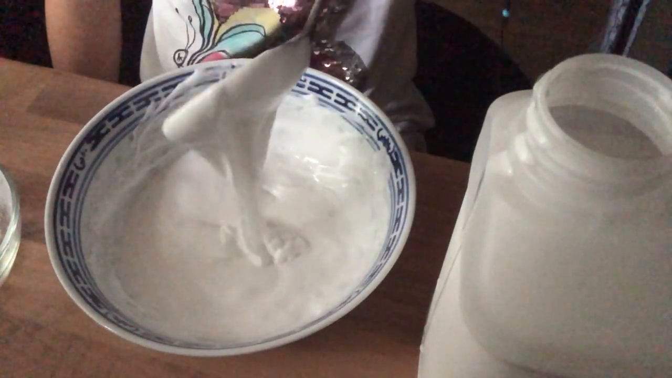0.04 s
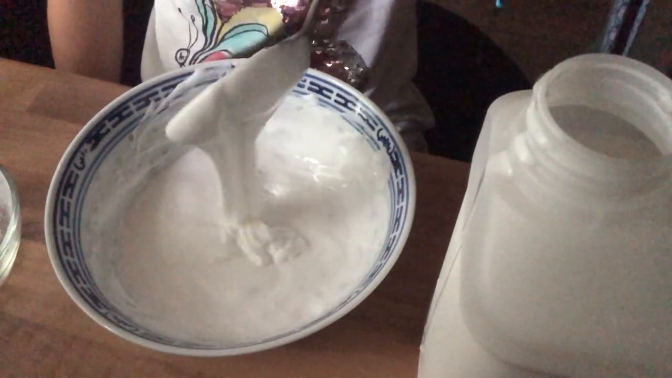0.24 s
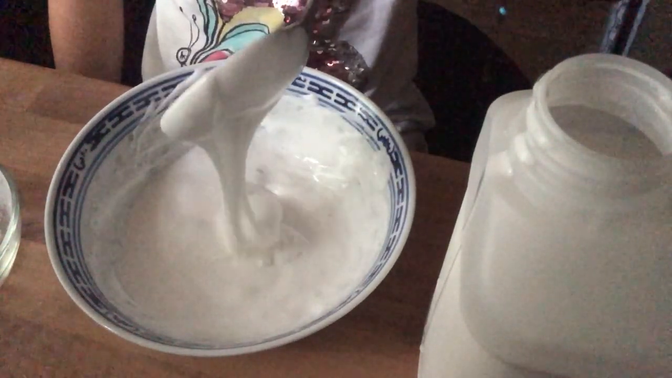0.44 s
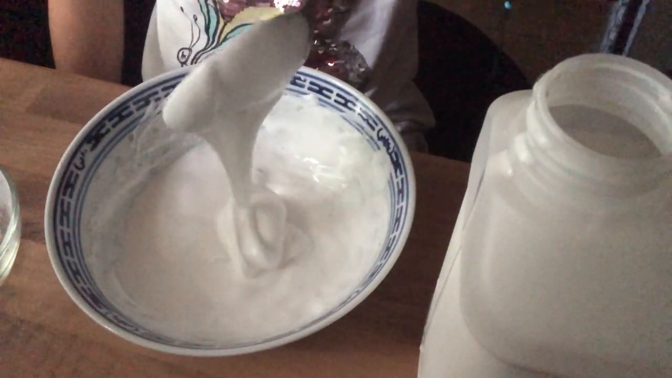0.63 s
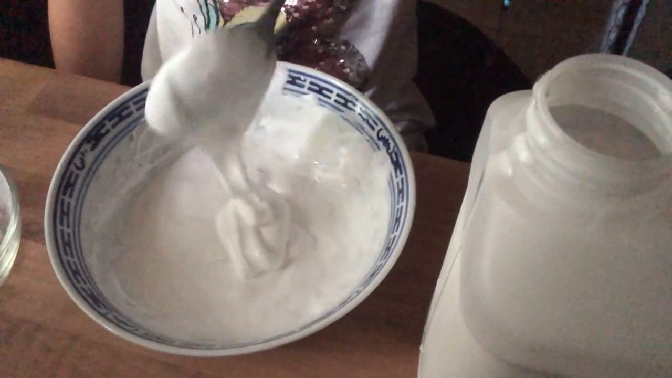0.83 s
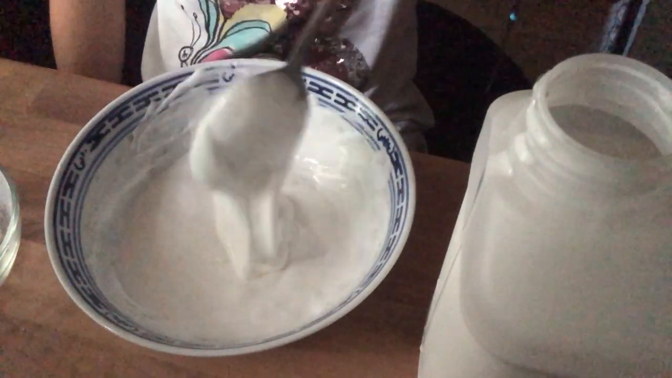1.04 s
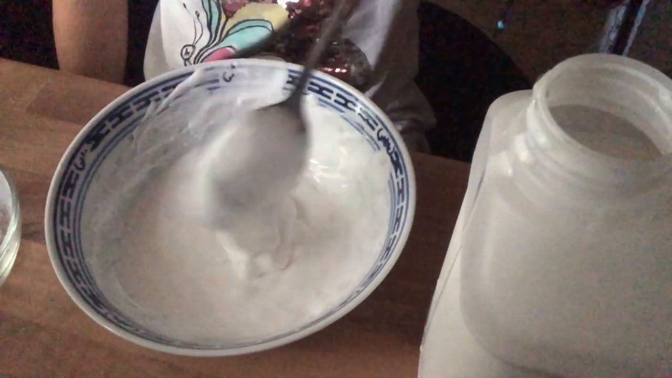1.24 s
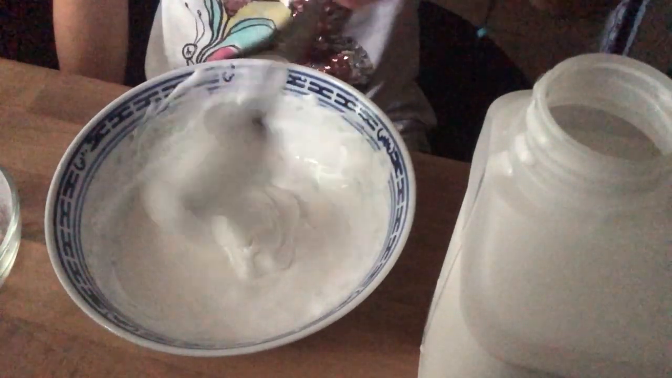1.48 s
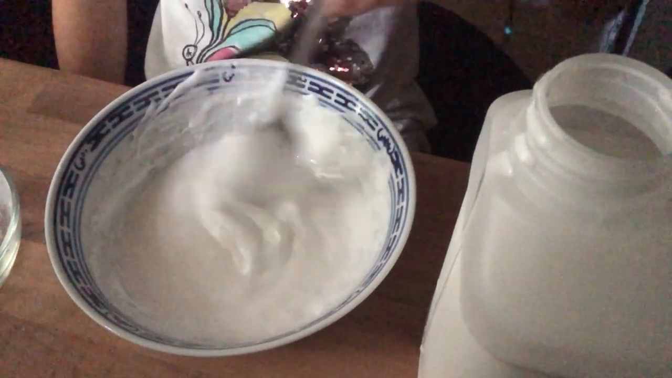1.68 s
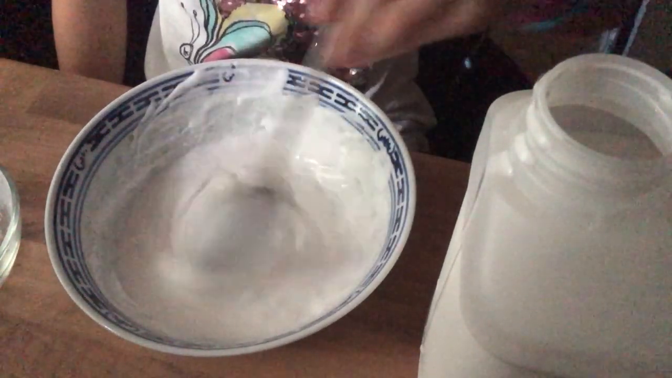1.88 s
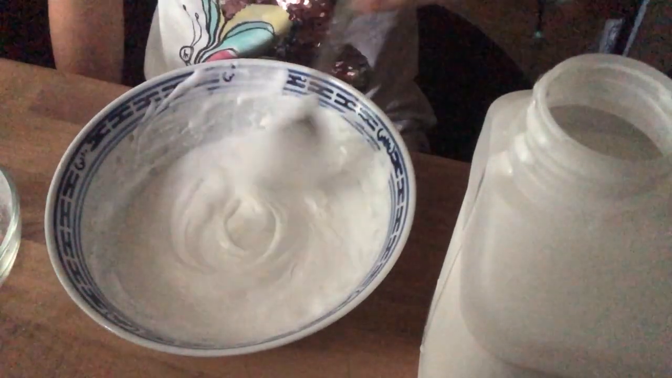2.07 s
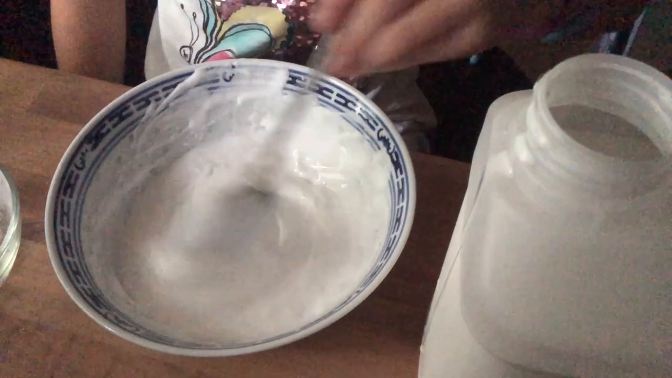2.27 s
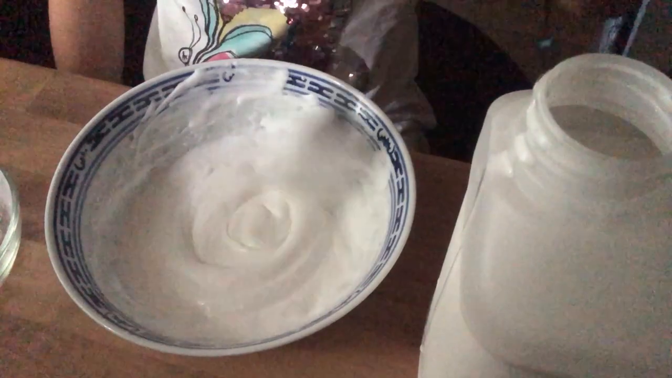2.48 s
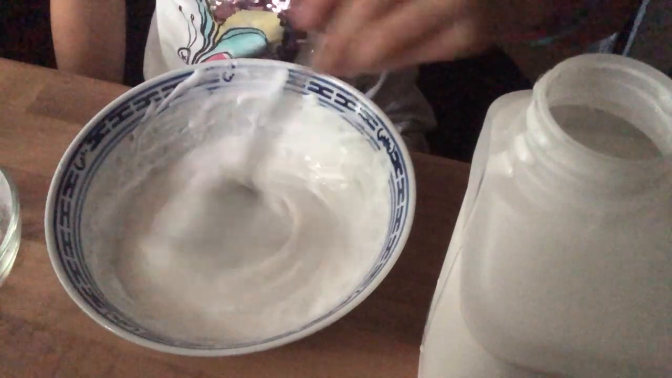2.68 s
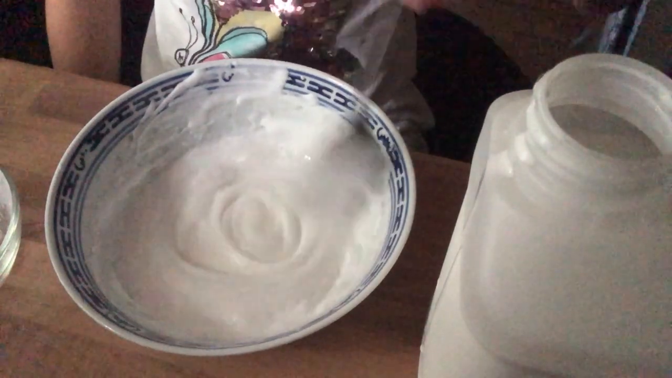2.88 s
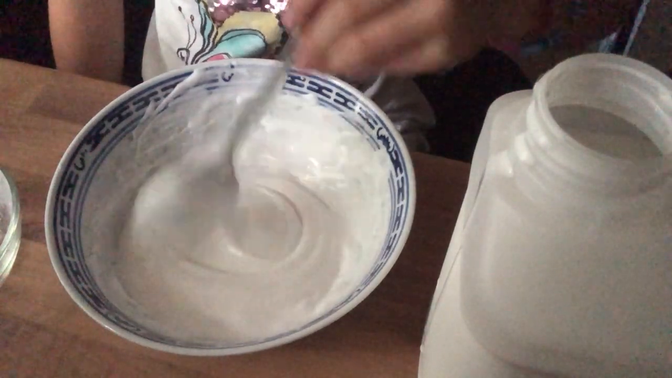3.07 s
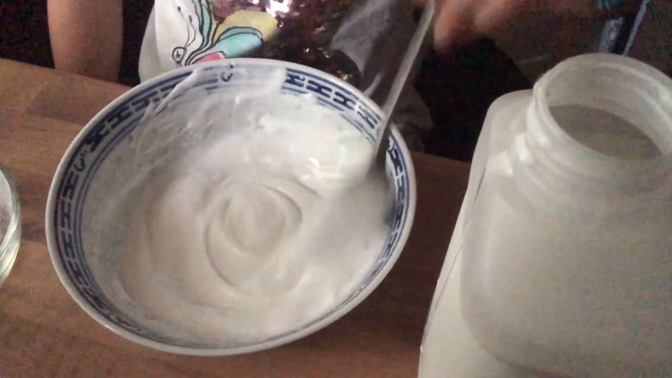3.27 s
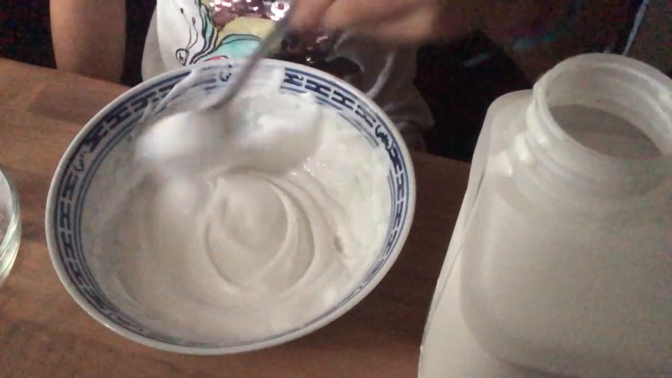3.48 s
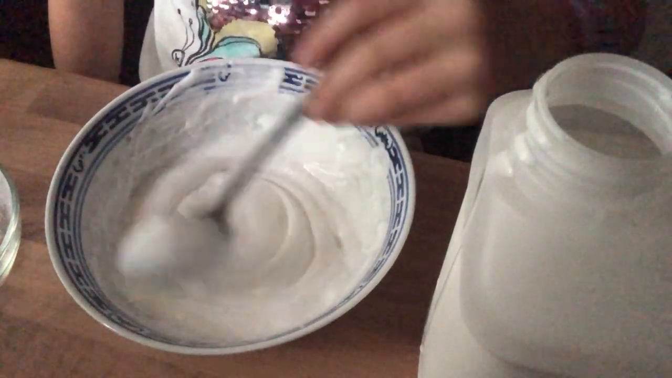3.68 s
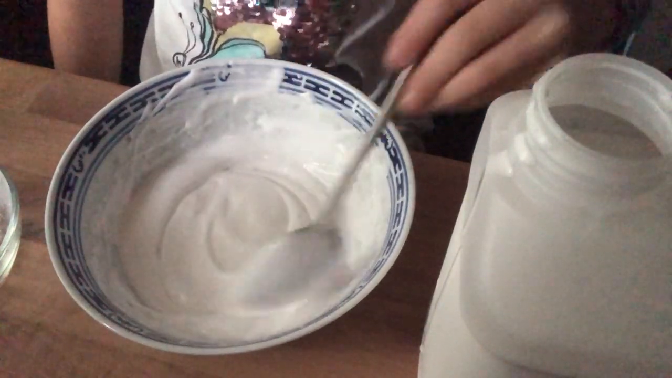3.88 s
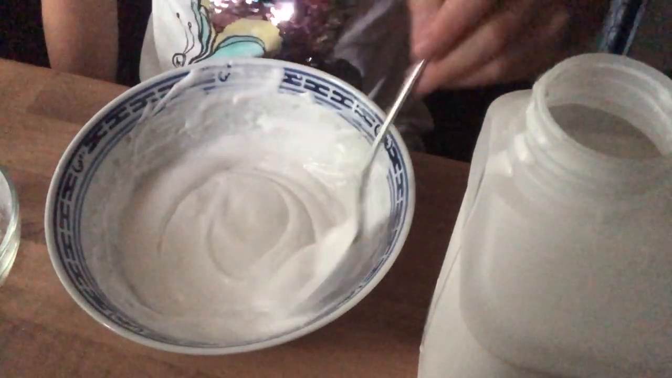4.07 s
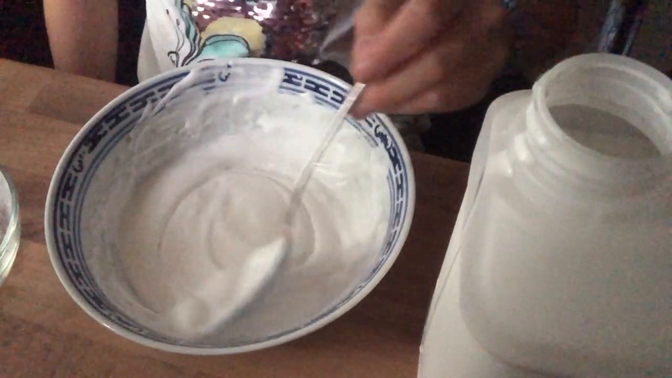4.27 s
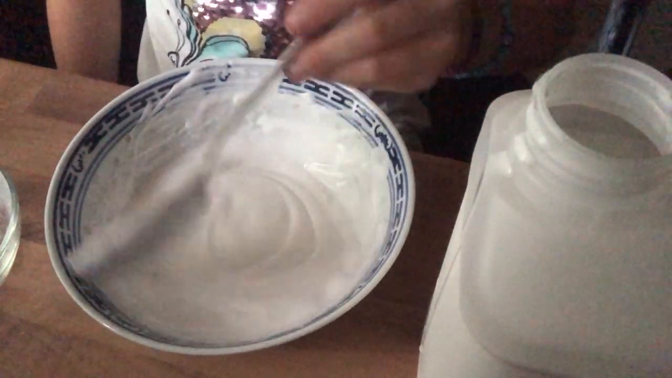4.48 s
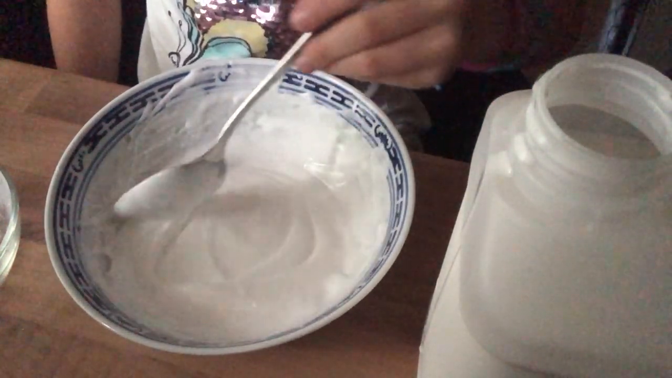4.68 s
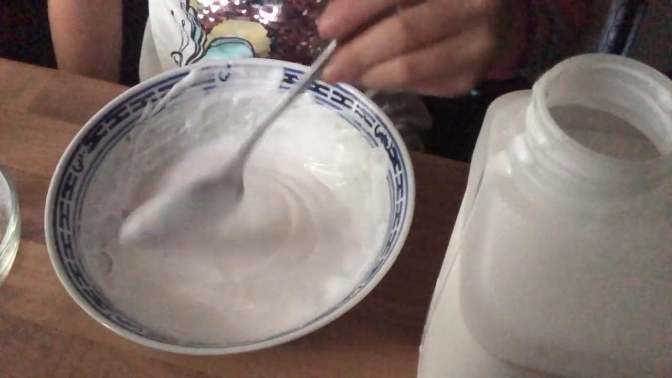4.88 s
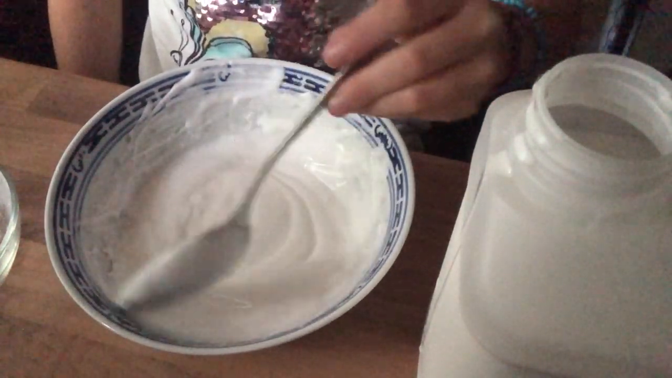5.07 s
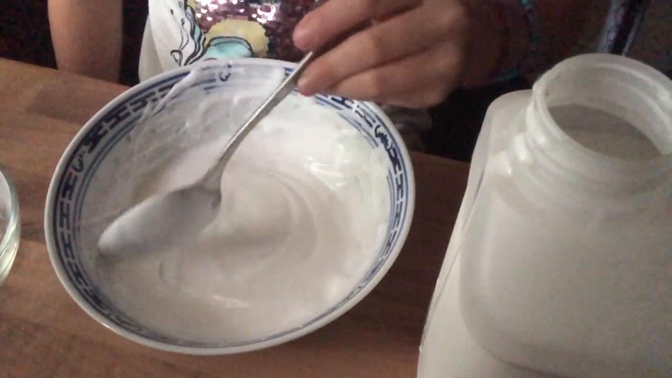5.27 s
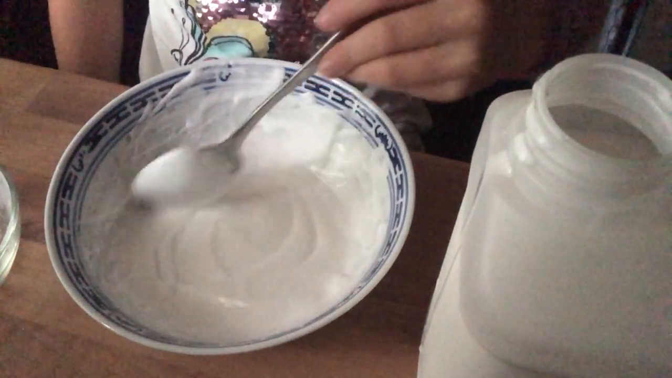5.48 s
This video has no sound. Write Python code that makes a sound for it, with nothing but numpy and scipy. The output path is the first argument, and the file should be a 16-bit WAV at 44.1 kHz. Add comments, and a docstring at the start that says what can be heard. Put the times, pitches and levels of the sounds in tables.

```python
"""In a quiet room, a metal spoon stirs a thick foamy mixture in a porcelain bowl on a wooden table.
Bare contacts set the bowl ringing; cushioned ones clack, thump the table and mostly ring the spoon.
Late on the spoon slides along the wall, its tip biting through to the glaze, and jabs it once, chattering.
Rings are sums of dying sine waves; thuds, scrapes, snaps and room noise are filtered random noise.
Faint snaps, ticks and rustles, low rumbles of the table, room reflections and a faint hum complete it."""
import sys
import numpy as np
from scipy import signal
from scipy.fft import next_fast_len
from scipy.io import wavfile

SR = 44100
rng = np.random.default_rng(int(sys.argv[2]) if len(sys.argv) > 2 else 0)


def transcribe(u):
    """Save the signal u as a 16-bit wav file named by the first command-line argument.

    u: samples, shape (n,) or (channels, n), limited to [-1, 1]; the rate is SR.
    q: integer samples, one column per channel.
    """
    v = np.clip(np.atleast_2d(u).T, -1, 1)
    q = np.round(v * 32767).astype(np.int16)
    wavfile.write(sys.argv[1], SR, q)


N = 243431  # length in samples, about 5.5 s
RING_T = np.arange(SR * 6 // 10) / SR  # time axis of one short sound, 0.6 s

# main ringing tones of the bowl: pitch_hz, level_db (relative), t60_s (time to lose 60 dB)
BOWL_MODES = [(889, 0, .32), (1647, 0, .37), (2778, 0, .24)]
# spectrum of a metal tick: frequency_hz, level_db (per Hz, relative)
TICK_COLOUR = [(500, -28.5), (3500, -9.5), (6000, -3.5), (8000, -6.5), (9300, -14), (12000, -8),
               (16000, -21)]
# spectrum of wet friction: frequency_hz, level_db (per Hz, relative)
RASP_COLOUR = [(300, -20), (1400, -6.5), (2500, -0.5), (4500, -11), (6000, -17), (8000, -22.5),
               (16000, -27)]


def amp(db):
    """Turns decibels into a gain."""
    return 10 ** (np.asarray(db) / 20)


def unit(x):
    """Scales a sound to an rms (average strength) of one."""
    return x / np.sqrt(np.mean(x ** 2) + 1e-20)


def read(points, hz):
    """Joins (frequency, value) points by straight lines on a log-frequency axis."""
    point_hz, value = np.transpose(points)
    return np.interp(np.log(hz + 1), np.log(point_hz + 1), value)


def add(mix, start_s, sound):
    """Mixes a sound in at its start time, cutting off what runs past the end."""
    part = mix[round(start_s * SR):][:len(sound)]
    part += sound[:len(part)]


def colour(x, points, corner_hz=np.inf):
    """Filters without pre-echo to the given spectrum; a soft contact rolls off above its corner."""
    size = next_fast_len(len(x) + 4096)
    hz = abs(np.fft.fftfreq(size, 1 / SR))
    roll_off = .5 * np.log1p((hz / corner_hz) ** 7.3)
    log_gain = np.log(amp(read(points, hz))) - roll_off
    response = np.exp(np.conj(signal.hilbert(log_gain)))  # minimum phase: nothing sounds early
    return np.fft.ifft(np.fft.fft(x, size) * response).real[:len(x)]


def dying(t60_s):
    """Exponential decay that loses 60 dB in t60_s."""
    return np.exp(-np.log(1000) * RING_T / t60_s)


def burst(points, t60_s, corner_hz=np.inf, rise_s=0.00034):
    """Dying noise, like many crowded, heavily damped tones; has the energy of 25 ms at unit rms."""
    swell = 1 - np.exp(-RING_T / rise_s)
    noise = rng.standard_normal(len(RING_T)) * swell * dying(t60_s)
    x = colour(noise, points, corner_hz)
    return x / np.linalg.norm(x) * np.sqrt(.025 * SR)


def ring(modes, hold=1, build_s=0.0018):
    """Sine tones that swell briefly after the contact, then die; hold scales the ring time."""
    swell = 1 - np.exp(-RING_T / build_s)
    tones = sum(amp(db) * dying(t60_s * hold) * np.sin(2 * np.pi * hz * RING_T)
                for hz, db, t60_s in modes)
    return swell * tones


def resonate(x, modes):
    """Sums side-by-side resonances; each filters the sound twice to get steep skirts."""
    out = 0
    for hz, width_hz, db in modes:
        peak = np.concatenate(signal.iirpeak(hz, hz / width_hz, SR))
        out = out + amp(db) * signal.sosfilt([peak, peak], x)
    return out


def wander(t, depth_db, step_s=0.029):
    """A gain that drifts at random, heading for a new value every step_s."""
    knots = rng.standard_normal(200)
    drift = np.interp((t - t[0]) / step_s, np.arange(len(knots)), knots)
    return amp(depth_db * drift)


def push(t, length_s, attack_s, release_s):
    """One push of the hand, t seconds after it starts: rises, holds, then loses 60 dB in release_s."""
    attack = np.clip(t / attack_s, 0, 1)
    release = np.exp(-np.log(1000) * np.maximum(t - length_s, 0) / release_s)
    return attack * release


def contact(blow_db, hard_hz, thud_db):
    """One spoon touch: a crack, the crockery's clack, a metal tick and the table's thud."""
    # spectrum of crack and clack: frequency_hz, level_db (per Hz, relative)
    clack_colour = [(100, -36.5), (600, -15.5), (850, -1.5), (1150, 3.5), (1420, -4), (1800, 2),
                    (2300, -5.5), (2750, 5), (3600, -4.5), (16000, -6)]
    # spectrum of the table's thud: frequency_hz, level_db (per Hz, relative)
    table_colour = [(30, -32), (75, -11.5), (120, -12), (178, -7), (290, -11.5), (380, 1), (447, 3),
                    (510, -4), (590, -5.5), (655, 5), (760, -19.5), (1500, -23.5), (5000, -92.5)]
    crack = burst(clack_colour, .014, hard_hz)
    clack = amp(-3.5) * crack + amp(-2.0) * burst(clack_colour, 0.063, hard_hz)
    width = np.sqrt(hard_hz / 2200)  # a harder contact spreads over more modes
    # the tick is 27 dB below the blow at 3000 Hz hardness and gains 18.5 dB per octave
    tick_db = blow_db - 27 + 18.5 * np.log2(hard_hz / 3000)
    tick = amp(tick_db) * burst(TICK_COLOUR, 0.049)
    thud = amp(thud_db) * burst(table_colour, 0.098)
    return width * amp(blow_db) * clack + tick + thud


def clinks():
    """Spoon on bare porcelain: the spot that is struck decides how strongly each bowl tone rings."""
    # hits: start_s, blow_db (before hardness scaling), hardness_hz, table_thud_db,
    # first_ring_db, second_ring_db, third_ring_db, overtones_db, ring_time_factor (no unit)
    hits = [ (2.8457, -33.5, 4020, -34.5, -33, -28, -50, -33, 0.93),
            (3.2706, -39.5, 1550, -38, -51, -43.5, -54, -67.5, 0.69),
            (3.5126, -34.5, 2950, -43, -49, -30, -51, -44.5, 0.86),
            (3.5555, -40, 3940, -49, -44, -29.5, -39, -41.5, 0.97),
            (4.6173, -45.5, 1070, -40, -45.5, -64, -57.5, -66.5, 1.5),
            (4.6670, -37, 2080, -42, -45.5, -35.5, -33.5, -54.5, 1.03),
            (5.4040, -74, 2590, -65.5, -80, -71, -59, -82, 0.48)]
    # higher ringing tones of the bowl: pitch_hz, level_db (relative), t60_s (before the ring time factor)
    overtone_modes = [(4173, 7, 0.068), (4236, -5.5, 0.24), (5900, -13.5, 0.15), (5930, -15, .18),
                      (7850, -8, 0.13), (10050, -28, 0.22), (12420, -33.5, .1)]
    out = np.zeros(N)
    for start_s, blow_db, hard_hz, thud_db, *mode_dbs, over_db, hold in hits:
        struck = [(hz, db + drive_db, t60_s)
                  for (hz, db, t60_s), drive_db in zip(BOWL_MODES, mode_dbs)]
        bowl = ring(struck, hold, build_s=0.0062)
        overtones = amp(over_db) * ring(overtone_modes, hold, build_s=0.00089)
        add(out, start_s, contact(blow_db, hard_hz, thud_db) + bowl + overtones)
    return out


def taps():
    """Spoon on the coated wall: the mixture muffles the bowl, so mostly the spoon itself rings."""
    # touches: start_s, blow_db (before hardness scaling), hardness_hz, table_thud_db, spoon_ring_db
    touches = [ (2.1155, -38, 2480, -36.5, -26), (3.005, -41.5, 2540, -46, -40),
               (3.4712, -50, 1460, -48, -59), (3.4984, -47.5, 2330, -43.5, -47),
               (3.597, -47.5, 2400, -41.5, -51), (3.6660, -52.5, 3450, -65, -51),
               (3.6790, -49.5, 4100, -53, -46), (3.8220, -54, 2650, -56, -49),
               (3.8634, -57, 2720, -56.5, -47), (4.2118, -45.5, 2730, -45.5, -66)]
    # ringing tones of the spoon: pitch_hz, level_db (relative), t60_s
    spoon_modes = [(1878, -6.5, 0.043), (1880, -30, 0.032), (2666, -16.5, 0.09), (2737, -1, 0.073),
                   (2765, -7.5, 0.11), (2880, -13.5, 0.047), (2975, -1, 0.03), (4410, -20.5, 0.038),
                   (6930, -29, 0.047), (8370, -17, 0.046), (10320, -26, 0.054), (11650, -43, 0.041),
                   (13300, -31, 0.052)]
    spoon_tick_db = -32.5  # tick of the spoon, relative to its ring
    muffled_bowl_db = -13.5  # ring of the coated bowl, relative to the blow
    out = np.zeros(N)
    for start_s, blow_db, hard_hz, thud_db, spoon_db in touches:
        spoon = ring(spoon_modes) + amp(spoon_tick_db) * burst(TICK_COLOUR, 0.042)
        bowl = ring(BOWL_MODES[1:2])  # only its second tone
        rings = amp(spoon_db) * spoon + amp(blow_db + muffled_bowl_db) * bowl
        add(out, start_s, contact(blow_db, hard_hz, thud_db) + rings)
    return out


def jab(ring_db=-30.0, grating_db=-1, grating_t60_s=0.047, build_s=0.0013):
    """The tip chatters in quick touches; spoon and bowl ring together under a dying noisy grating."""
    # chatter: start_s, blow_db (before hardness scaling), hardness_hz, table_thud_db
    chatter = [(5.0427, -42.5, 5500, -41), (5.0449, -40.5, 6100, -37), (5.0490, -46, 5460, -41.5)]
    # ringing tones of the spoon held against the bowl: pitch_hz, level_db (relative), t60_s
    pressed_modes = [(1946, -1, 0.07), (2083, -1, 0.05), (2160, 2.5, 0.042), (2800, -33, 0.12),
                     (3350, -4.5, 0.13), (3640, -8.5, 0.11), (4244, -0.5, 0.065), (4270, 2, .09),
                     (4440, 1, 0.061), (4830, 1.5, 0.045), (4930, -5.5, 0.05), (5990, 0.5, 0.06),
                     (6050, -7, 0.12), (7400, -12, 0.078), (7550, -10, 0.054), (7900, -4.5, 0.085),
                     (8850, -13.5, 0.053), (9840, -18.5, 0.091), (12250, -9.5, 0.05)]
    out = np.zeros(N)
    for start_s, *touch in chatter:
        add(out, start_s, contact(*touch))
    bands = [(hz, 14 / t60_s, db) for hz, db, t60_s in pressed_modes]  # a short ring is a wide resonance
    noise = rng.standard_normal(len(RING_T)) * dying(grating_t60_s)
    grating = unit(resonate(noise, bands))
    rings = ring(pressed_modes, build_s=build_s)
    grating_gain = amp(grating_db) * np.std(rings)  # set relative to the ring
    add(out, chatter[0][0], amp(ring_db) * (rings + grating_gain * grating))
    return out


def scrapes(spread_db=2.5, wander_db=3.5, rasp_db=-4, flutter_db=1.5):
    """Dense tiny slips of steel over wet glaze; as the tip travels, each resonance swells and fades."""
    # light passes along the coated wall: start_s, length_s, groan_db, grit_db (both midway)
    strokes = [(4.22, 0.38, -58.5, -63.5), (5.08, 0.14, -57, -59), (5.29, 0.1, -65.5, -73)]
    # the tip bites through to the glaze: start_s, length_s, groan_db, grit_db (both midway)
    bites = [(4.208, 0.017, -47.5, -48), (4.347, 0.043, -56.5, -49.5), (4.455, 0.04, -63, -56.5),
             (4.5, 0.048, -49.5, -56.5), (5.185, 0.085, -48.5, -54.5), (5.359, 0.025, -65, -67)]
    # low resonances under the spoon: pitch_hz, width_hz, level_db (relative)
    groan_modes = [(178, 44, 1.5), (416, 31, 1), (474, 92, -1), (593, 67, 0.5), (927, 84, -10.5),
                   (1082, 92, 2.5), (1174, 37, 4), (1300, 99, -6)]
    # high resonances under the spoon: pitch_hz, width_hz, level_db (relative)
    grit_modes = [(1650, 28, -3), (1873, 280, 3), (2070, 270, 1), (2790, 91, 1), (3230, 500, -5),
                  (4280, 84, 5), (4400, 290, -11), (5900, 190, -7), (7840, 48, -3.5), (10000, 130, -21),
                  (12450, 200, -22.5)]
    attack_s, release_s = 0.0082, 0.085  # time to take hold; time to lose 60 dB after letting go
    groan_gain_db, grit_loss_db = 6.5, 5  # change from start to end of a scrape
    out = np.zeros(N)
    for start_s, length_s, groan_db, grit_db in strokes + bites:
        slip_db = spread_db * np.minimum(rng.exponential(1, len(RING_T)), 4)
        slips = amp(slip_db) * rng.standard_normal(len(RING_T))
        groan = unit(sum(wander(RING_T, wander_db) * resonate(slips, [mode]) for mode in groan_modes))
        grit = unit(sum(wander(RING_T, wander_db) * resonate(slips, [mode]) for mode in grit_modes))
        # wet friction fills in between the resonances
        grit = unit(grit + amp(rasp_db) * unit(colour(slips, RASP_COLOUR)))
        # the spoon slows: the groan grows while the grit thins
        slowing = np.minimum(RING_T / length_s, 1) - .5
        low = amp(groan_db + groan_gain_db * slowing) * groan
        high = amp(grit_db - grit_loss_db * slowing) * grit
        pressure = push(RING_T, length_s, attack_s, release_s)
        pressure = pressure * wander(RING_T, flutter_db, step_s=0.012)
        add(out, start_s, pressure * (low + high))
    return out


def rumble():
    """Hard stirring shifts the bowl, and the tabletop answers in its lowest resonances."""
    # the pushed bowl shifts on the table: start_s, length_s, level_db
    shoves = [(3.278, 0.038, -50.5), (3.475, .21, -53.5), (3.772, 0.029, -57), (4.197, 0.026, -59),
              (4.489, 0.17, -65)]
    # resonances of the tabletop: pitch_hz, width_hz, level_db (relative)
    tabletop_modes = [(67, 26, 1.5), (108, 35, 0), (176, 66, 3), (261, 210, -15.5)]
    attack_s, release_s = 0.022, 0.26  # time to get moving; time to lose 60 dB
    t = np.arange(N) / SR
    level = sum(amp(db) * push(t - start_s, length_s, attack_s, release_s)
                for start_s, length_s, db in shoves)
    return level * unit(resonate(rng.standard_normal(N), tabletop_modes))


def snaps_and_rustles():
    """Faint snaps and ticks of spoon and foam, and a soft rustle as the spoon drags through the foam."""
    # faint bright ticks and snaps: start_s, level_db
    snaps = [(1.625, -74.5), (1.689, -77), (1.927, -71), (2.95, -75), (3.276, -59.5), (3.287, -64),
             (3.303, -65), (3.336, -60), (3.6, -60), (3.617, -63), (4.62, -66)]
    # spectrum of a snap: frequency_hz, level_db (per Hz, relative)
    snap_colour = [(200, -37), (1500, 2.5), (4000, -0.5), (8000, -7.5), (16000, -11.5)]
    # the spoon drags through the foam alone: start_s, length_s, level_db
    swirls = [(1.567, 0.12, -77.5), (3.921, 0.276, -76)]
    attack_s, release_s = .04, .2  # time to get moving; time to lose 60 dB
    out = np.zeros(N)
    for start_s, db in snaps:
        add(out, start_s, amp(db) * burst(snap_colour, 0.088))
    for start_s, length_s, db in swirls:
        rustle = unit(colour(rng.standard_normal(len(RING_T)), RASP_COLOUR))
        add(out, start_s, amp(db) * push(RING_T, length_s, attack_s, release_s) * rustle)
    return out


def room(x, build_s=0.0071):
    """Scattered reflections, made from noise that builds up and dies, the treble first."""
    # how long the room rings: frequency_hz, t60_s
    room_decay = [(80, 1), (250, 0.28), (1000, 0.23), (4000, 0.22), (14000, 0.21)]
    hz, t, bands = signal.stft(rng.standard_normal(len(RING_T)), SR, nperseg=256)
    bands = bands * np.exp(-np.log(1000) * t / read(room_decay, hz)[:, None])
    build_up = 1 - np.exp(-(RING_T / build_s) ** 2)
    tail = signal.istft(bands, SR)[1][:len(RING_T)] * build_up
    return signal.fftconvolve(x, tail / np.linalg.norm(tail))[:N]


def air(air_db=-68.5, hum_hz=158, hum_width_hz=24, hum_db=-75):
    """Steady room noise, with a low wavering hum made by a narrow resonance on noise."""
    # spectrum of the room noise: frequency_hz, level_db (per Hz, relative)
    air_colour = [(15, -48), (25, -12.5), (59, -1), (86, -9), (157, -7), (174, -14.5), (189, -15.5),
                  (241, -12), (276, -15.5), (307, -10), (437, -18.5), (1010, -22.5), (1220, -24),
                  (14200, -36.5), (15800, -38.5)]
    hiss, drive = rng.standard_normal((2, N))
    hum = unit(resonate(drive, [(hum_hz, hum_width_hz, 0)]))
    return amp(air_db) * unit(colour(hiss, air_colour)) + amp(hum_db) * hum


def scene(room_db=-12):
    """Adds up the spoon's work, its reflections and the room noise."""
    near = clinks() + taps() + jab() + scrapes() + rumble() + snaps_and_rustles()
    reflections = amp(room_db) * room(near)
    return (near + reflections + air())[None]


def record(dry):
    """The recorder's band limit: a steep low-pass filter at 15850 Hz."""
    low_pass = signal.firwin(511, 15850, window=("kaiser", 9), fs=SR)
    return signal.oaconvolve(dry, low_pass[None], "same")


dry = scene()
out = record(dry)
transcribe(out)
```